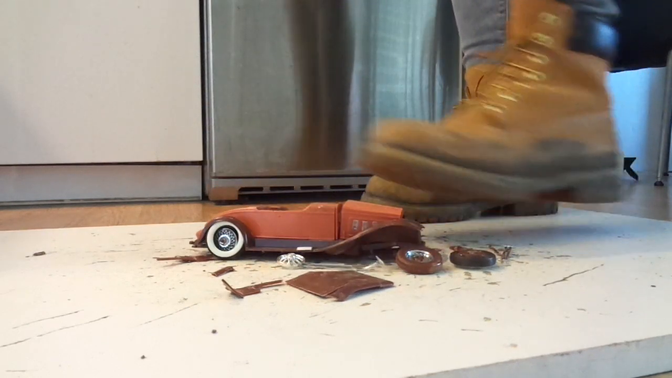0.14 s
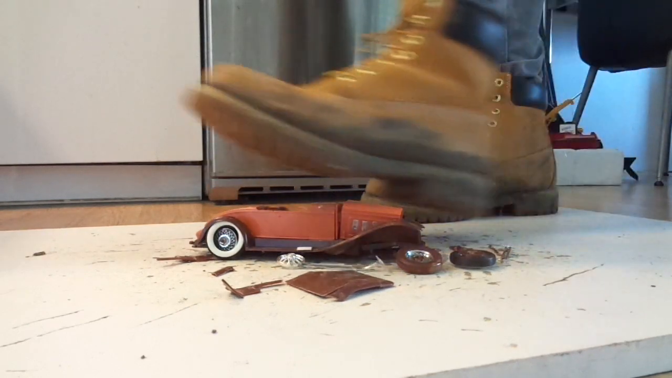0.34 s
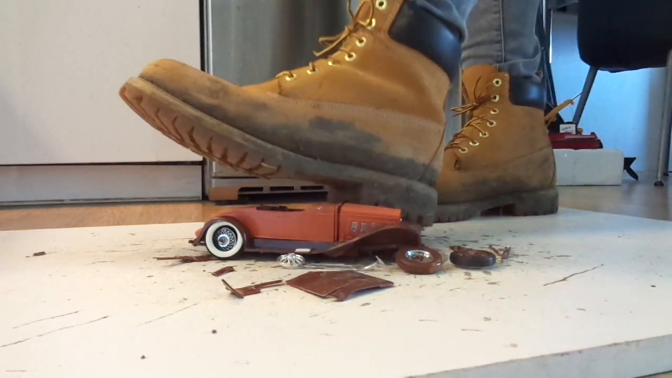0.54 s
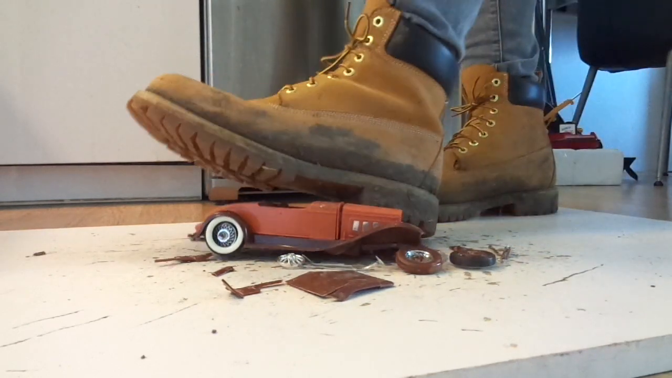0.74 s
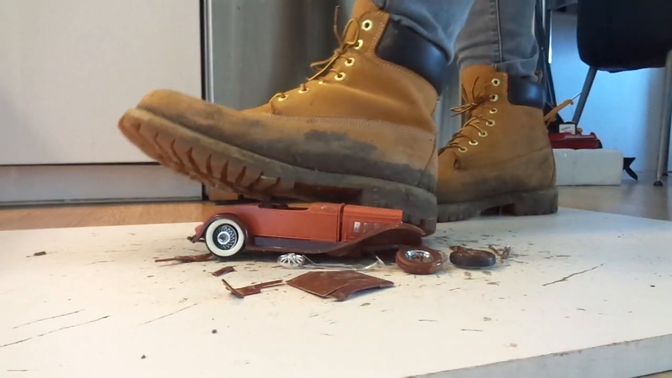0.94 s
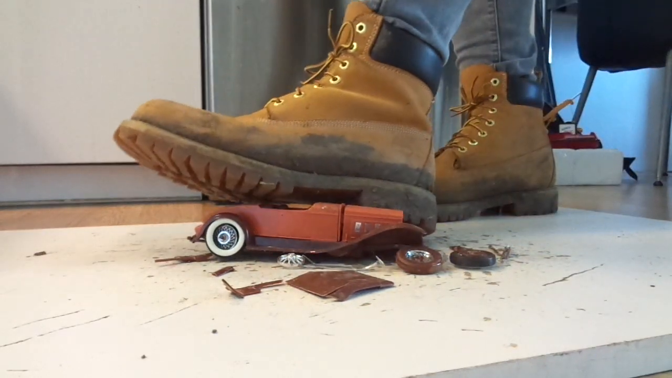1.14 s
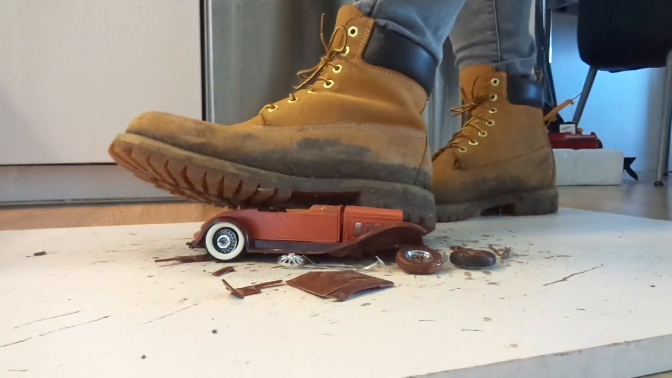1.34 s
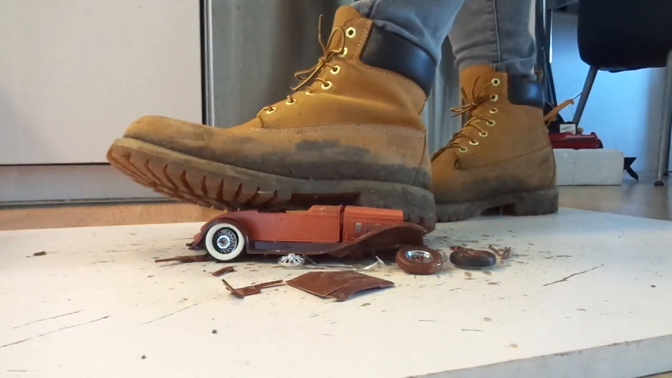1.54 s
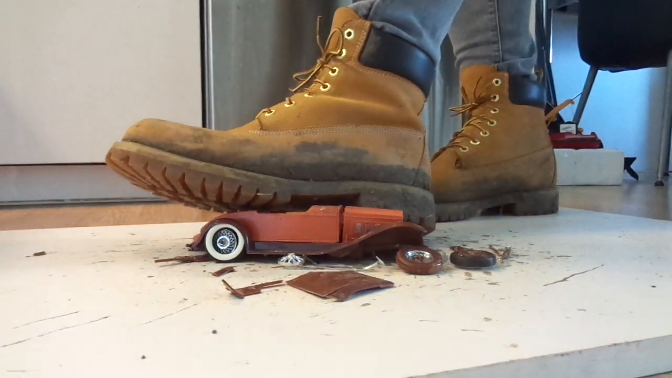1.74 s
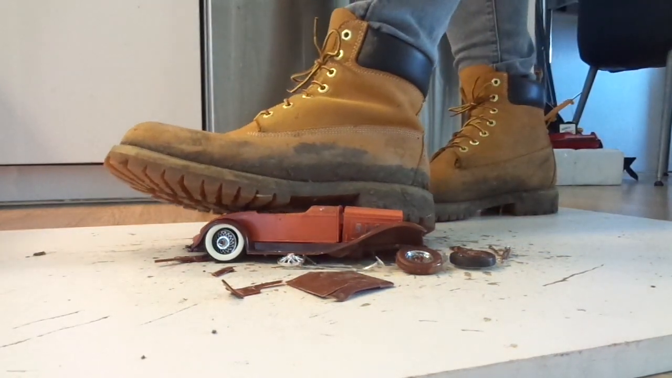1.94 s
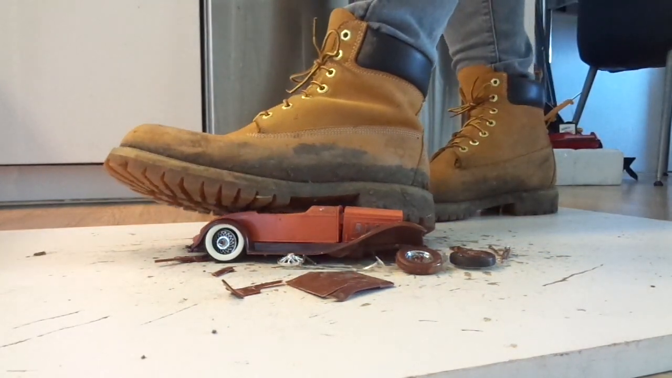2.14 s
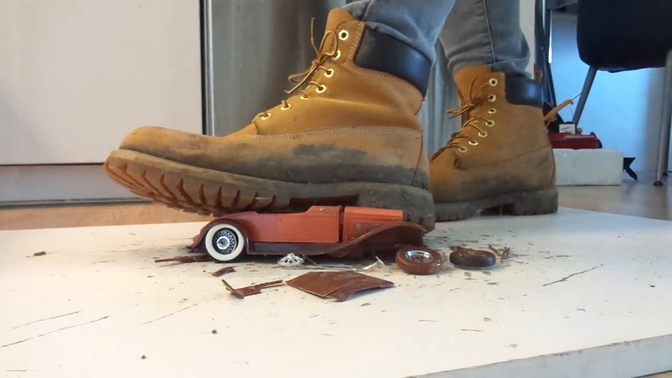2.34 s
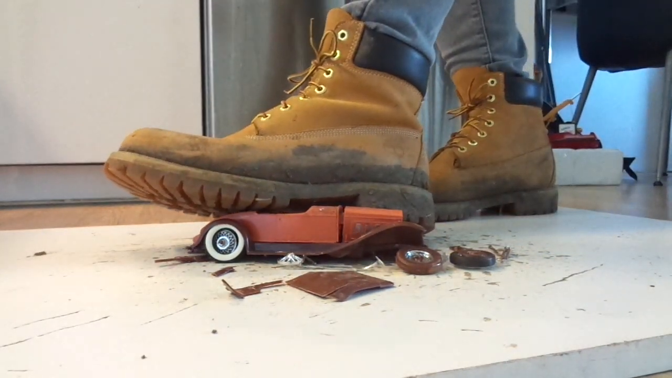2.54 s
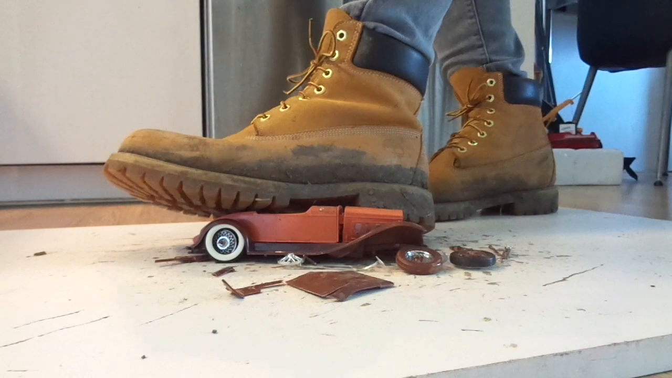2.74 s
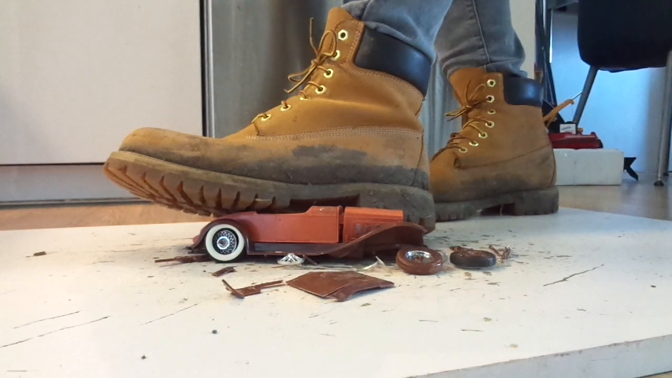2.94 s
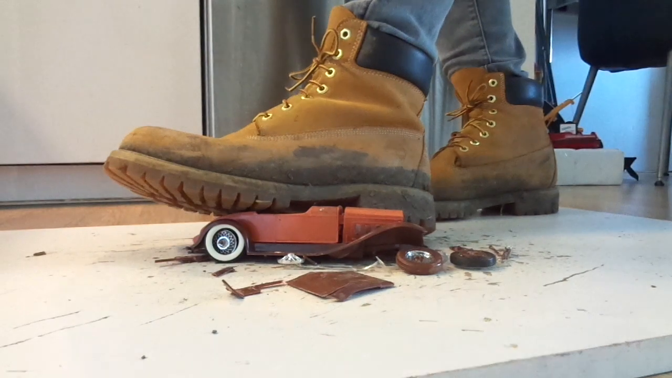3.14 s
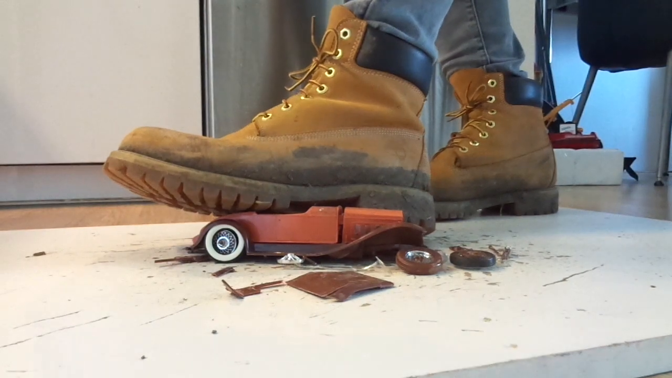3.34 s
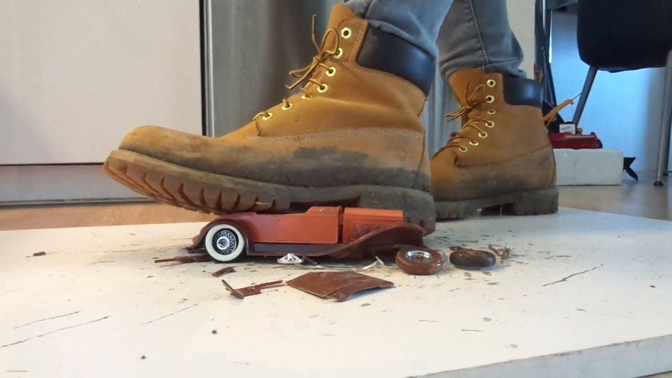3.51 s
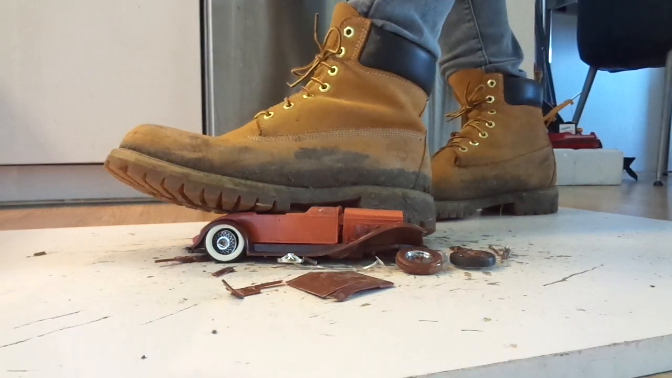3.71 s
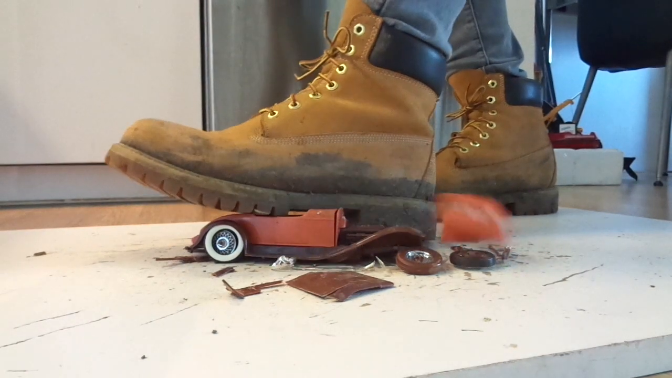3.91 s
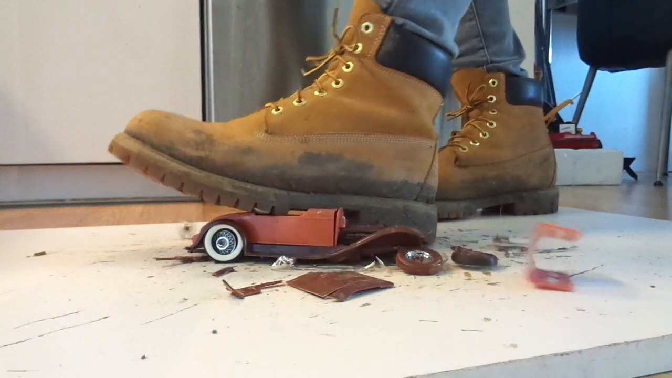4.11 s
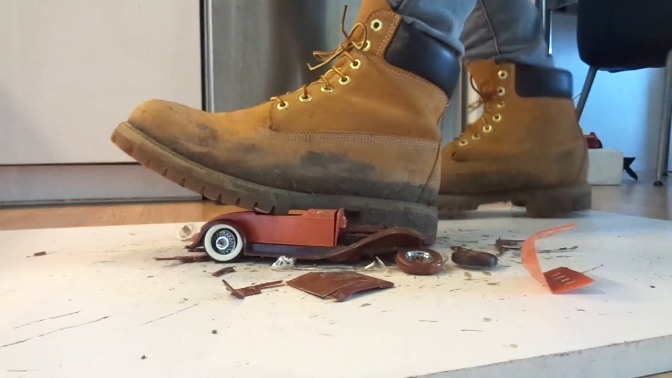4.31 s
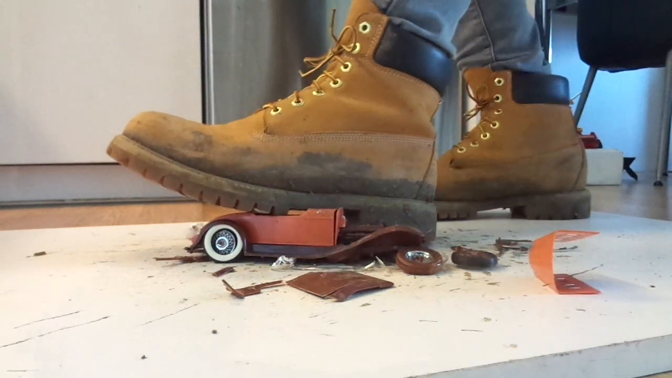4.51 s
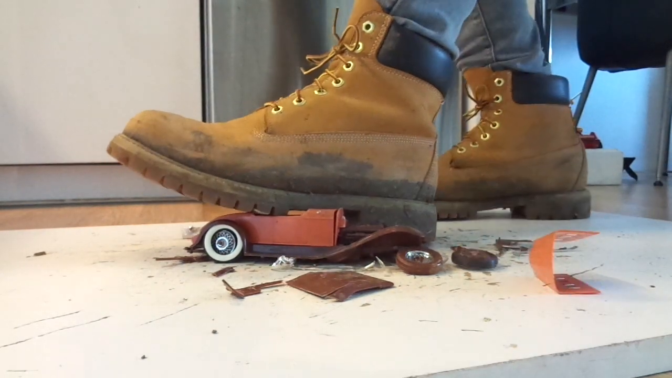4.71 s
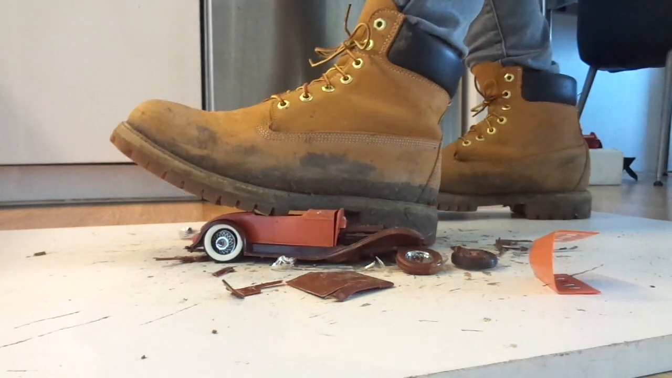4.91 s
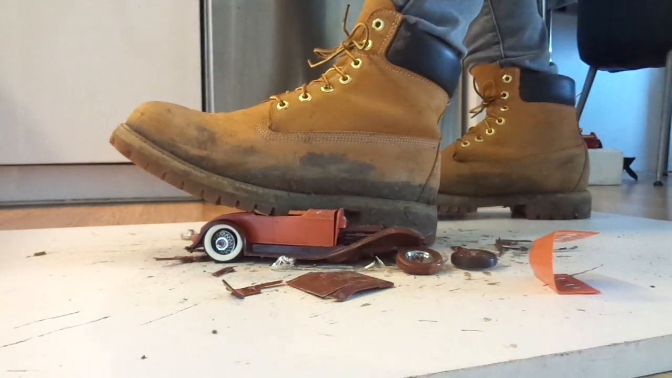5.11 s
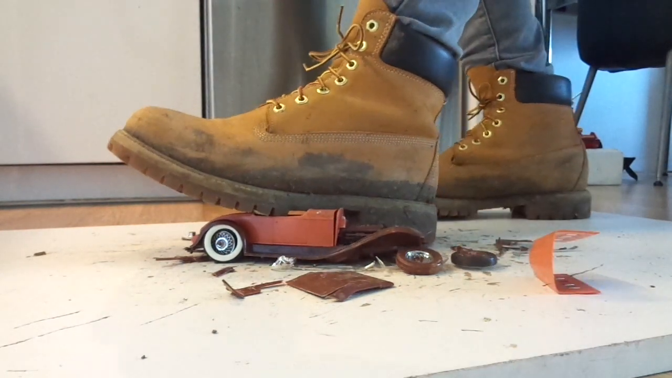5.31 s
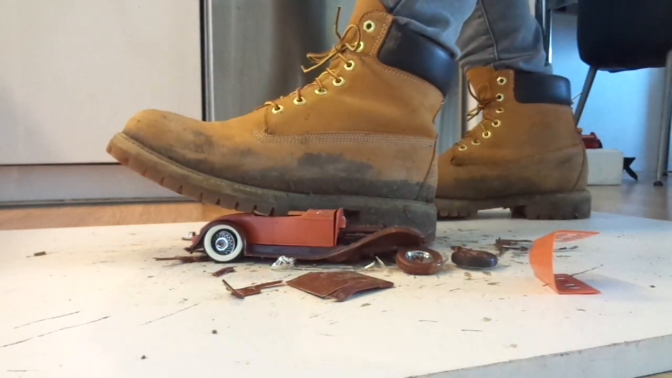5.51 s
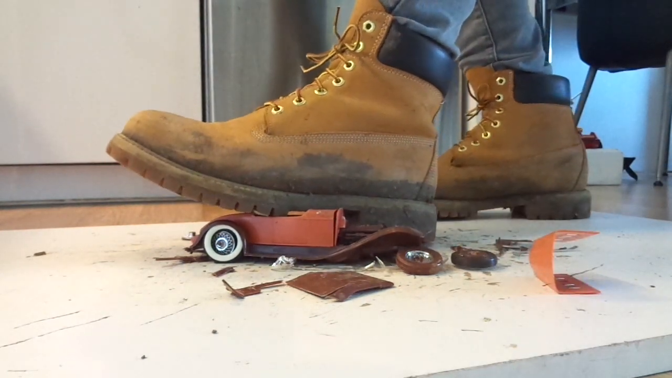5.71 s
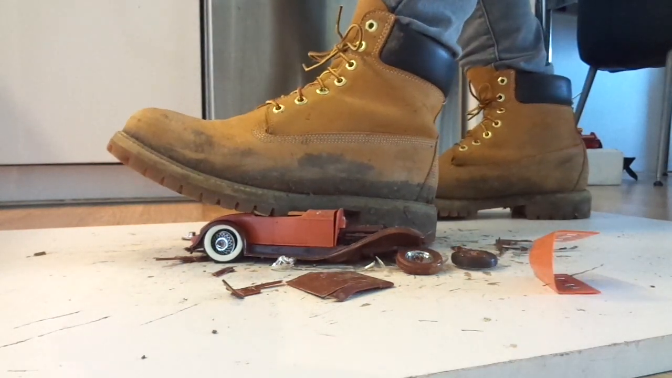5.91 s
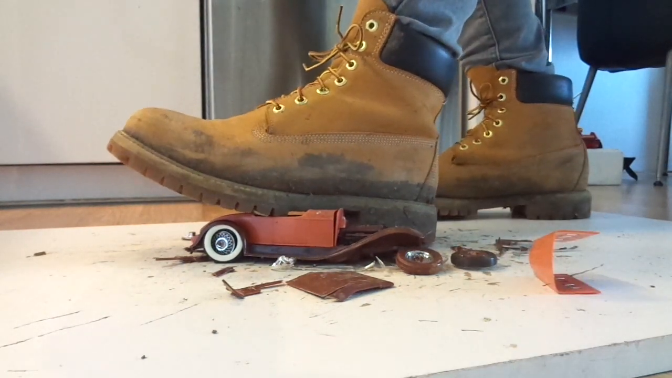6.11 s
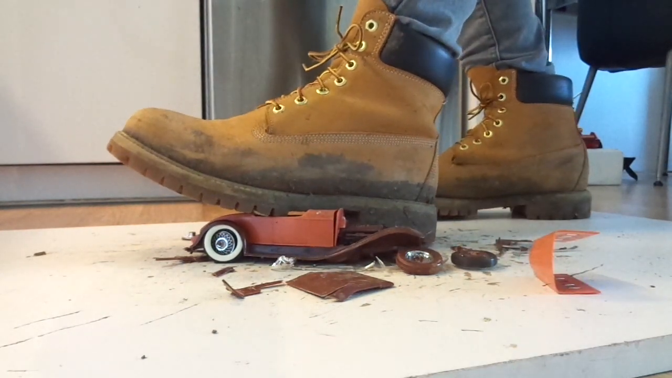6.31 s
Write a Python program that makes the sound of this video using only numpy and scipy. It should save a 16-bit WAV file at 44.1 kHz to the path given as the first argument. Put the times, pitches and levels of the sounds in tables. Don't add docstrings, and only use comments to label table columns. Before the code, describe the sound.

Faint hum and hiss of a hard-walled kitchen for the first half second. At about 0.55 s a boot loads a brittle plastic model car: dense crackling, small taps and sharp snaps, strongest at 0.94, with more at 1.04, 1.27 and 1.32. Faint creaks and ticks follow, a hollow tap at 1.96, and a hard crack at 2.26. Quiet, with a barely perceptible distant low drone, then small ticks near 3.0 and another strong snap at 3.52. Around 3.73 cracks gather, and at 3.79 the shell collapses in a violent, clipping burst with a wooden board knock and ringing room. Crackling fragments continue past 4.0, with snaps at 4.12, a knock and dull taps around 4.35 and a crack at 4.52. Hollow clicks come near 4.93 and 4.98 over a very faint high, wavering plastic squeak; a tiny tick at 5.34, then room hum until about 6.4.

```python
import sys
import numpy as np
from scipy import signal
from scipy.fft import rfft, irfft
from scipy.io import wavfile
from scipy.ndimage import uniform_filter1d, minimum_filter1d

SR = 44100
rng = np.random.default_rng(int(sys.argv[2]) if len(sys.argv) > 2 else 0)


def level_to_linear(level):
    exponent = np.asarray(level, float) / 20
    return 10 ** exponent


def file_out(sig):
    cols = np.atleast_2d(sig).T
    lim = np.clip(cols, -1, 1)
    pcm = np.round(lim * 32767).astype(np.int16)
    wavfile.write(sys.argv[1], SR, pcm)


N = 280166


def fall(t, t60):
    return np.exp(-np.log(1000) * t / max(t60, 0.002))


def band(x, lo_hz, hi_hz):
    return signal.sosfilt(signal.butter(2, [lo_hz, min(hi_hz, 0.45 * SR)], "band", fs=SR, output="sos"), x)


def unit(x):
    return x * np.sqrt(SR / 1000 / np.sum(x ** 2))


def curve(points):
    s, db = np.transpose(points)
    return level_to_linear(np.interp(np.arange(N) / SR, s, db, -200, -200))


# (f/Hz, level/dB per Hz)
AIR_COLOUR = [(12, -36), (20, 2), (38, -31), (59, -5.5), (135, -3), (169, -4.5), (199, 3), (387, -3),
              (693, -3.5), (940, -1.5), (1020, -0.5), (1640, -6.5), (15000, -18)]


def hum_and_hiss():
    hz, db = np.transpose(AIR_COLOUR)
    f = np.maximum(np.fft.rfftfreq(N, 1 / SR), 1)
    colour = level_to_linear(np.interp(np.log(f), np.log(hz), db))
    air = irfft(rfft(rng.standard_normal(N)) * colour, N)
    return level_to_linear(-56) * air / air.std()


# (t/s, level/dB, brightness/dB)
STRAIN_SPANS = [
    [(0.53, -37, -5), (0.56, -26, 5.5), (0.63, -29.5, 4.5), (.67, -45, 3), (0.728, -27.5, -4),
     (0.868, -37, -4), (0.93, -56, -12)],
    [(1.3, -46.5, 3), (1.55, -51, 2)],
    [(2.9, -52.5, -1), (2.99, -45.5, -4), (3.15, -49.5, -4.5)],
    [(3.83, -31.5, 1.5), (3.93, -21, 5.5), (4.01, -16, 8), (4.33, -39.5, 7)],
    [(5.0, -56, 0.5), (5.078, -52, 7), (5.2, -53, -5.5)],
]


def crackle():
    ticks_per_s = 3000
    happens = rng.random(N) < ticks_per_s / SR
    tick_db = np.minimum(2.0 * rng.exponential(size=N), 11)
    ticks = happens * level_to_linear(tick_db) * rng.standard_normal(N)
    dull, bright = band(ticks, 1300, 3900), band(ticks, 3600, 7900)
    dull_gain = sum(curve([(s, db - 14) for s, db, _ in span]) for span in STRAIN_SPANS)
    bright_gain = sum(curve([(s, db + bright_db - 26) for s, db, bright_db in span]) for span in STRAIN_SPANS)
    return dull_gain * dull / dull.std() + bright_gain * bright / bright.std()


# (f/Hz, 60 dB decay t/s, level/dB)
ROOM_TAIL = [(250, 0.52, 2.5), (450, 0.71, -4.5), (844, 0.65, 2), (1300, 0.96, -5), (2200, 0.77, -0.5),
             (3330, 0.66, 2), (5870, 0.57, -3), (8500, 0.57, 2.5), (13000, 0.18, 6)]


def room():
    t = np.arange(SR) / SR
    early = level_to_linear(-31.5) * rng.standard_normal(SR) * fall(t, 0.051)
    tail = sum(level_to_linear(db) * band(rng.standard_normal(SR), hz / 1.322, hz * 1.334) * fall(t, t60)
               for hz, t60, db in ROOM_TAIL)
    nearest_wall_s = 0.0041
    return (early + level_to_linear(-41) * tail) * np.minimum(t / nearest_wall_s, 1)


# (low f/Hz, high f/Hz, added share)
HOLLOW_BANDS = [(903, 1860, 0.44), (2340, 3700, -0.21), (4020, 5600, 0.29), (11570, 21000, 0.069)]


def hollow(near):
    return near + sum(share * band(near, lo_hz, hi_hz) for lo_hz, hi_hz, share in HOLLOW_BANDS)


# (low f/Hz, high f/Hz of the release, scatter decay t/s, ringing level/dB, ringing decay t/s)
RINGING_PARTS = dict(board=[182, 490, 0.13, 1.5, 0.1], shell=[0.52, 1.416, 0.11, 1.7, 0.016],
                 plate=[2260, 6000, 0.046, 1.7, 0.0045], splinter=[6005.5, 12998.5, 0.2, 2.5, 0.13])


def struck(part, hz, grit, ring_db=0):
    lo, hi, scatter_t60, lead_db, lead_t60 = RINGING_PARTS[part]
    if part == "shell":
        lo, hi = lo * hz, hi * hz
    t = np.arange(len(grit)) / SR
    click = unit(band(1.0 * (t == 0), lo, hi))
    modes = np.sin(2 * np.pi * hz * t) + level_to_linear(-10) * np.sin(2 * np.pi * 1.5 * hz * t)
    ringing = level_to_linear(lead_db + ring_db) * unit(modes * fall(t, lead_t60 * level_to_linear(ring_db)))
    tear_s = 0.0007
    ragged = np.cbrt(grit[::-1]) * t * np.exp(-t / tear_s)
    torn = unit(signal.fftconvolve(click, ragged)[:len(t)])
    torn = unit(torn + 1.5 * ringing * (1 - np.exp(-t / tear_s)))
    scatter = unit(signal.fftconvolve(click + ringing, grit * fall(t, scatter_t60))[:len(t)])
    direct = unit(torn + level_to_linear(-3) * scatter)
    clean = unit(click + level_to_linear(-1.5) * ringing)
    return np.array([direct, clean])


# (t/s, plate level/dB, shell level/dB re plate, splinter level/dB re plate, shell f/Hz)
SNAPS = [(0.6841, -17, 4, -5, 1853), (0.9367, -7.5, -17, -5, 1450), (0.9493, -17, -12, -7.5, 1300),
         (1.0401, -12, -6, -15.5, 2240), (1.2697, -8.5, -4.5, -14, 2583), (1.3201, -13.5, -4, -10.5, 1990),
         (1.4179, -30, -11, -1.5, 1800), (1.6446, -39.5, 4.5, -12, 1054), (2.255, -7, -7.5, -20.5, 1253),
         (3.0375, -30.5, 2, -9, 2200), (3.246, -44.5, 5.5, -9.5, 2264), (3.273, -48.5, 4.5, -5, 1080),
         (3.519, -5.5, -7.5, -13.5, 1456), (3.7337, -20, 1.5, -15, 2210), (3.7445, -24.5, -12, -11.5, 2410),
         (3.7800, -21, 0, -17, 1144), (3.7869, 3, -4.5, -3, 1155), (3.808, -9, 5.5, -14.5, 1770),
         (3.9993, -9.5, -2, -17, 1880), (4.1049, -13.5, -19, -16.5, 1300), (4.1238, -9, -4.5, -10, 1240),
         (4.5207, -8, -3.5, -11, 1898), (5.3409, -43.5, 1.5, -10.5, 1920)]
# (t/s, shell level/dB, dullness/dB, shell f/Hz)
TAPS = [(0.539, -36.5, 18, 2077), (0.5890, -30, 3, 1800), (0.6499, -38, -4, 2080),
        (0.8147, -26.5, 10.5, 1760), (0.8238, -30.5, 14, 1294), (0.8695, -21.5, 12.5, 1830),
        (1.271, -23, 22.5, 1060), (1.3377, -29, 8.5, 1421), (1.4911, -38.5, 17, 1060),
        (1.7532, -43.5, 6, 1303), (1.8818, -46, 13, 1480), (1.963, -22, 21, 1196), (1.965, -21, 20, 1676),
        (2.2012, -52, 28, 1220), (2.5204, -48, -2, 1430), (3.0161, -37, 11, 820), (3.2059, -39.5, 19, 1280),
        (3.5150, -25, 4.5, 1480), (3.521, -23, 11, 790), (3.818, -18.5, 9.5, 1071),
        (4.0965, -22.5, 0.2, 1090), (4.3347, -13, 18.5, 1207), (4.3929, -26, 12, 1300),
        (4.5215, -19.5, 14.5, 860), (4.926, -21.5, 12, 1450), (4.9265, -22.5, 5.5, 2134),
        (4.9828, -17, 11, 1010)]
# (start t/s, gap t/s, first shell level/dB, change per piece/dB, shell f/Hz)
RUNS = [
    (0.714, 0.029, -24, -2.5, 1908),
    (3.7903, 0.0044, 0, -6, 1563),
    (4.021, .021, -22.5, -0.1, 1797),
    (4.206, 0.018, -23.5, -0.3, 2250),
]
RUN_COUNTS = (3, 4, 4, 2)


def pieces():
    taps = list(TAPS)
    for (s, gap, db, step_db, hz), count in zip(RUNS, RUN_COUNTS):
        for k, (late, size) in enumerate(rng.standard_normal((count, 2))):
            start = s + gap * k * (1 + 0.22 * late / count)
            taps.append((start, db + k * step_db, 5, hz * (1 + 0.25 * size)))
    size = rng.uniform(-1, 1, len(SNAPS) + len(taps))
    snap_rows = [(*row, 4840 * (1 + 0.055 * u)) for row, u in zip(SNAPS, size)]
    tap_rows = [(s, db - dull_db, dull_db, -9.5, hz, 3720 * (1 + 0.2 * u))
                for (s, db, dull_db, hz), u in zip(taps, size[len(SNAPS):])]
    return snap_rows + tap_rows


def fractures():
    out, size = np.zeros((2, N + SR)), SR // 14
    for s, db, shell_db, splinter_db, shell_hz, plate_hz in pieces():
        grit = rng.standard_normal(size) ** 3
        ring_db = 0.3 * max(shell_db - 4, 0)
        shell = level_to_linear(shell_db) * struck("shell", shell_hz, grit, ring_db)
        plate = struck("plate", plate_hz, grit)
        splinter = level_to_linear(splinter_db) * struck("splinter", 7000, grit)
        start = int(s * SR)
        out[:, start:start + size] += level_to_linear(db) * (shell - plate + splinter)
    return out[:, :N]


# (t/s, level/dB, f/Hz)
BOARD_KNOCKS = [(0.559, -32, 263), (0.684, -25.5, 395), (0.816, -40, 291), (0.87, -32, 293),
                (0.9368, -35.5, 293), (1.039, -30, 303), (1.27, -39.5, 504), (1.644, -43, 239),
                (1.962, -28, 303), (2.255, -26, 287), (3.039, -34.5, 410), (3.52, -24, 299),
                (3.733, -35.5, 460), (3.7873, -5, 374), (3.802, -14, 353), (3.998, -27, 450),
                (4.125, -28.5, 408), (4.335, -41.5, 213), (4.366, -16, 300), (4.521, -23.5, 450),
                (4.982, -26, 385)]


def board_knocks():
    out, size = np.zeros((2, N + SR)), SR // 14
    for s, db, hz in BOARD_KNOCKS:
        start = int(s * SR)
        out[:, start:start + size] += level_to_linear(db) * struck("board", hz, rng.standard_normal(size))
    return out[:, :N]


def thuds():
    t, hits = np.arange(SR // 4) / SR, np.zeros(N)
    footstep = (4.395, -41)  # t/s, level/dB
    for s, db in [(row[0], row[1] - 49.5) for row in SNAPS] + [footstep]:
        hits[int(s * SR)] = level_to_linear(db)
    push = unit(np.sin(2 * np.pi * 45 * t) * fall(t, 0.2))
    return signal.fftconvolve(hits, push)[:N]


# (peak t/s, half width t/s, level/dB)
DRONE_SWELLS = [
    (1.95, 0.27, -72),
    (2.68, 0.51, -71),
]


def distant_drone():
    low_hz, high_hz = 68.9, 103.1
    drone = band(band(rng.standard_normal(N), low_hz, high_hz), low_hz, high_hz)
    t = np.arange(N) / SR
    swell = sum(level_to_linear(db) * np.exp(-((t - s) / half) ** 2) for s, half, db in DRONE_SWELLS)
    return swell * drone / drone.std()


# (f/Hz, width f/Hz, level/dB)
SLIVER_TONES = [
    (6880, 140, 0),
    (4400, 140, -4),
]


def sliver():
    tones = sum(level_to_linear(db) * band(rng.standard_normal(N), hz - w / 2, hz + w / 2) * np.sqrt(SR / 2 / w)
                for hz, w, db in SLIVER_TONES)
    flicker_db = 3 * np.repeat(rng.standard_normal(N // 1024 + 1), 1024)[:N]
    start_s, end_s, attack_s, level_db = 4.74, 5.335, 0.12, -72
    swell = curve([(start_s - attack_s, level_db - 16), (start_s, level_db), (end_s, level_db)])
    return tones * level_to_linear(flicker_db) * swell


def scene():
    direct, clean = fractures() + board_knocks()
    ticks = crackle()
    near = hollow(direct + ticks + signal.fftconvolve(clean + ticks, room())[:N])
    high_pass = signal.butter(4, 200, "high", fs=SR, output="sos")
    near = signal.sosfilt(high_pass, near) + level_to_linear(-26) * near
    mid = near + thuds() + sliver() + hum_and_hiss() + distant_drone()
    return np.array([mid, mid])


def band_limit(x):
    return signal.sosfilt(signal.butter(12, 15140, fs=SR, output="sos"), x)


def record(dry):
    top_cut = signal.ellip(8, 0.2, 60, 15150, fs=SR, output="sos")
    x = signal.sosfilt(top_cut, np.clip(dry, -1, 1))
    frame, hold_frames = 1024, 4
    count = N // frame + 1
    loud = uniform_filter1d(x[0] ** 2, frame)[::frame]
    no_attack = loud < level_to_linear(2 * 4) * np.roll(loud, 1)
    calm = minimum_filter1d(1.0 * no_attack, size=5, origin=1)
    whim = np.repeat(rng.random(count) < 0.6, hold_frames)[:count]
    apart = uniform_filter1d(np.repeat(calm * whim, frame)[:N], frame // 2)
    noise = signal.fftconvolve(x[0], rng.standard_normal(256) / 16, "same")
    mix = x + level_to_linear(-17) * apart * noise * np.array([[1], [-1]])
    return band_limit(mix)


dry = scene()
out = record(dry)
file_out(out)
```